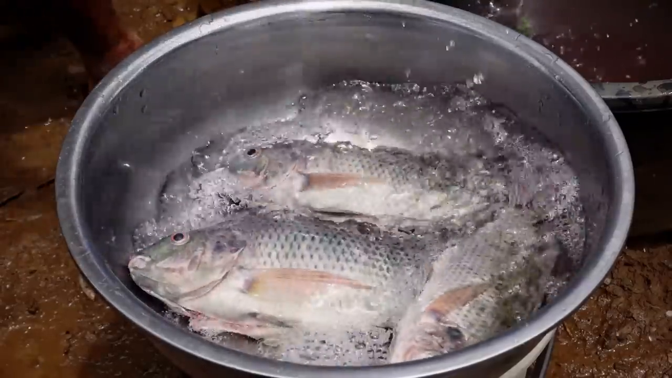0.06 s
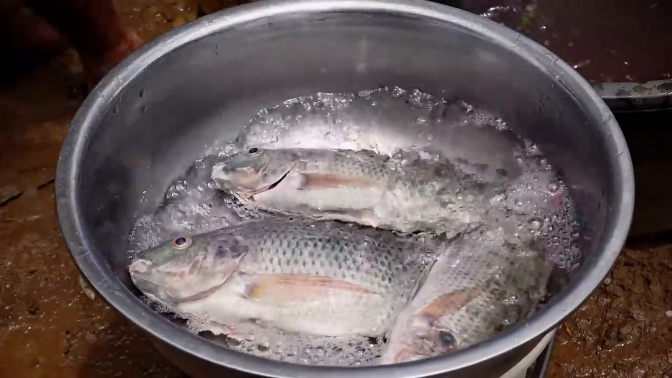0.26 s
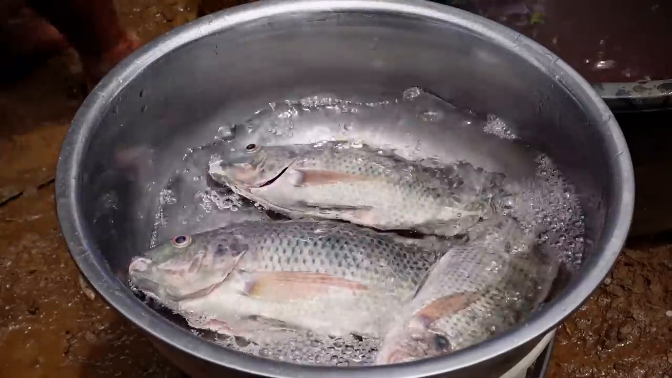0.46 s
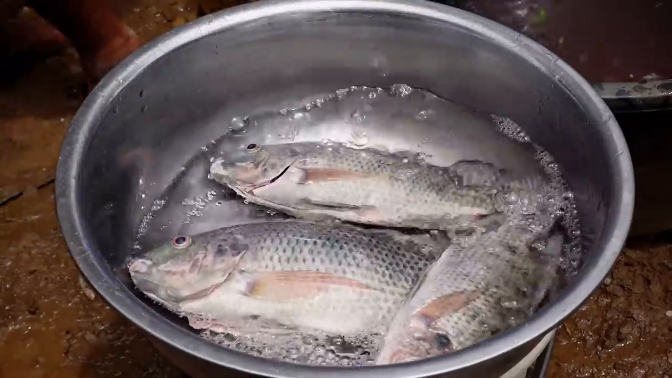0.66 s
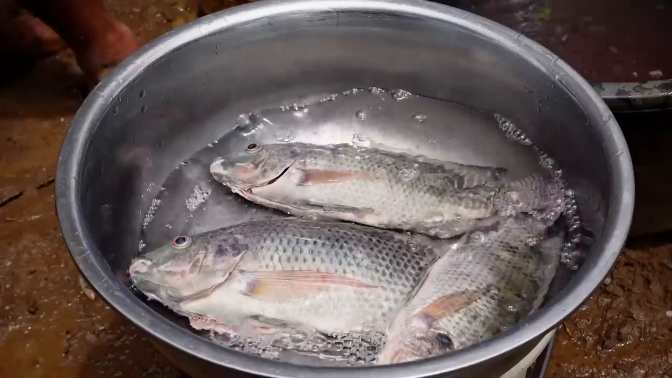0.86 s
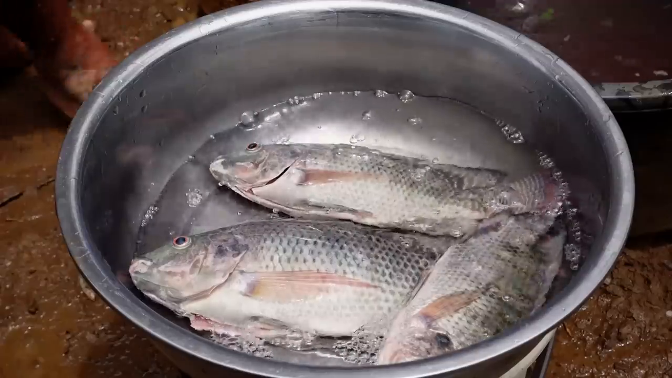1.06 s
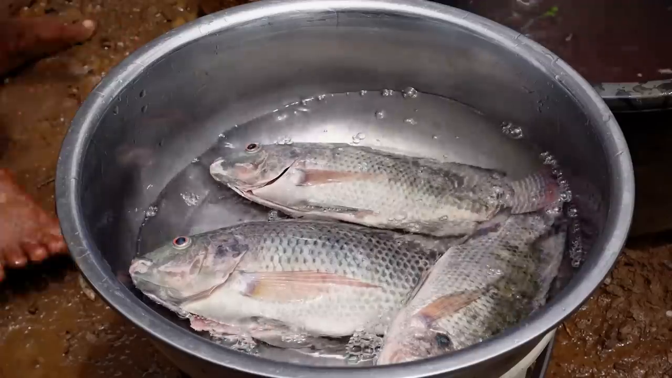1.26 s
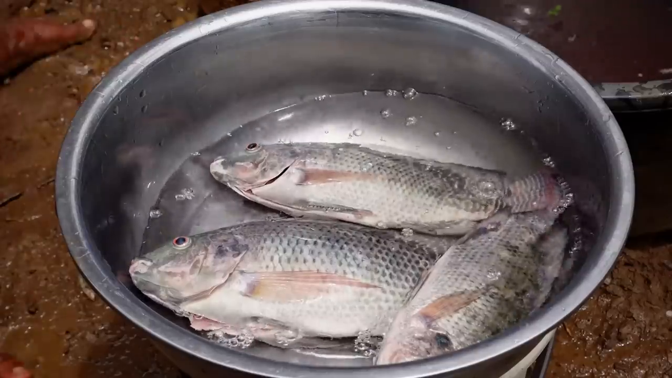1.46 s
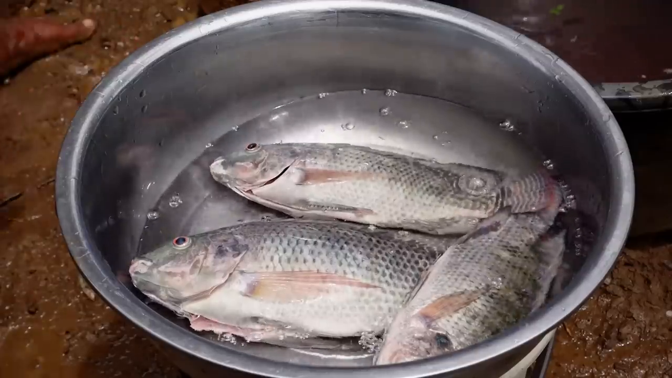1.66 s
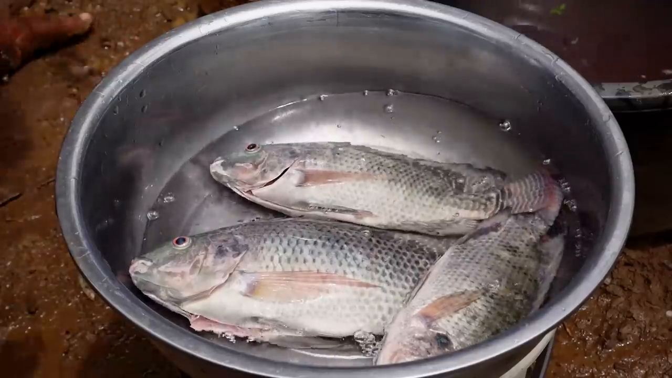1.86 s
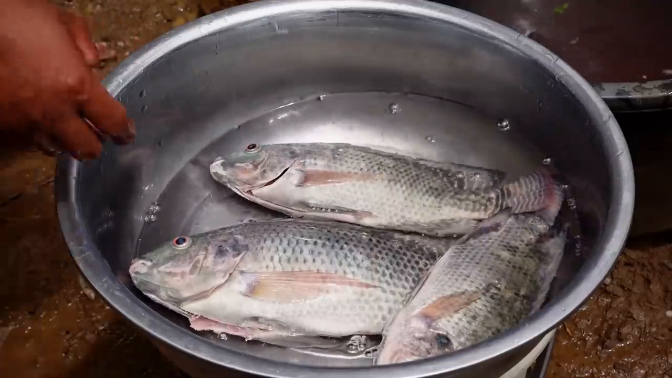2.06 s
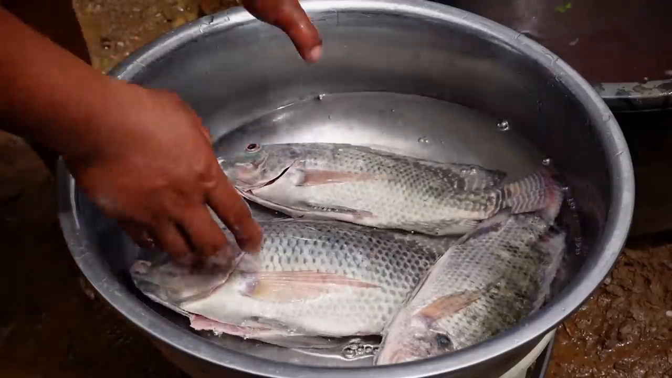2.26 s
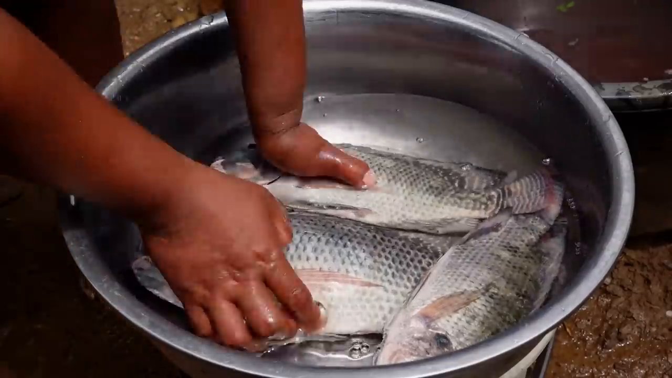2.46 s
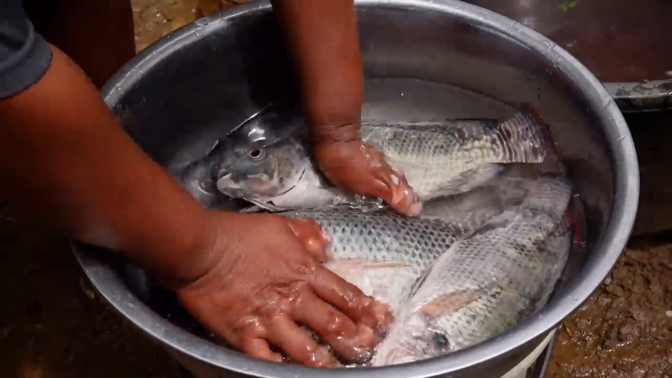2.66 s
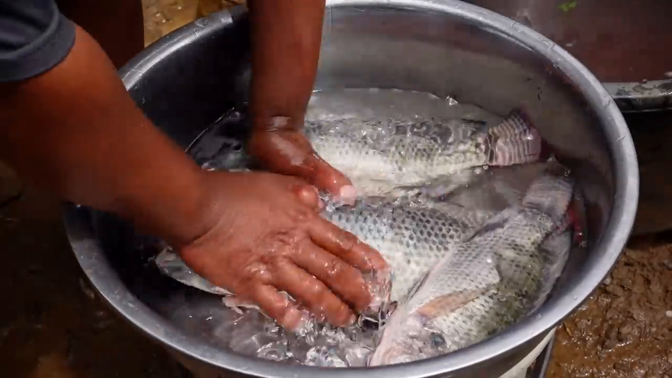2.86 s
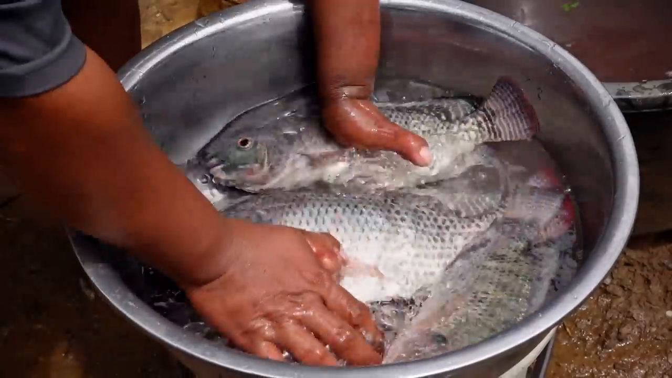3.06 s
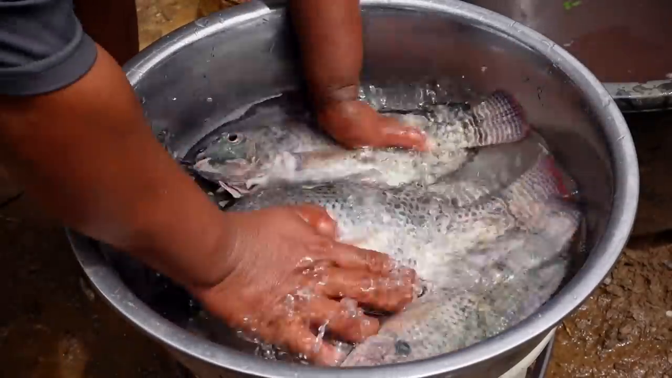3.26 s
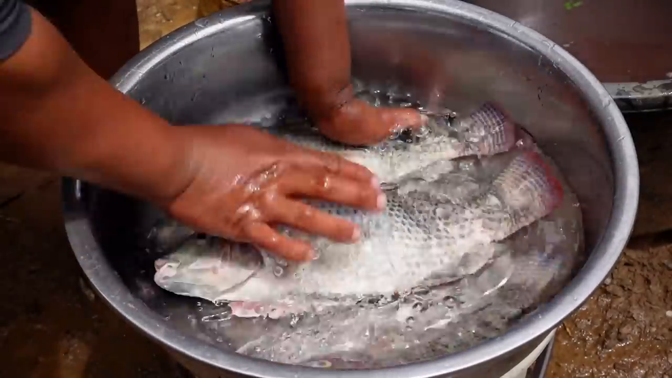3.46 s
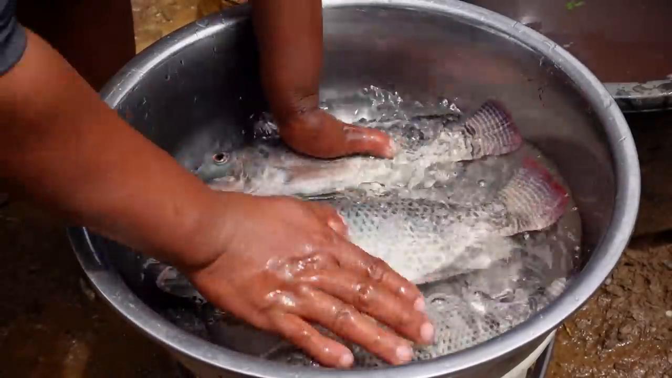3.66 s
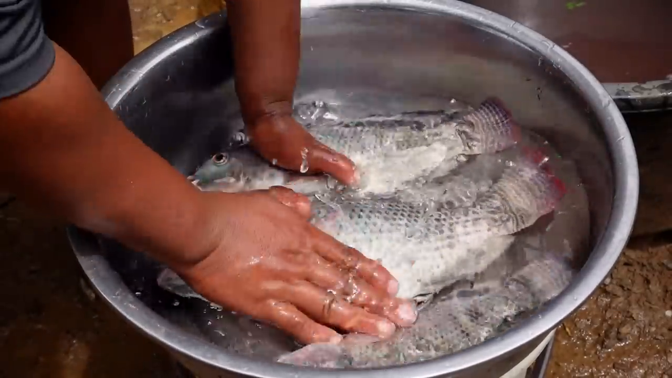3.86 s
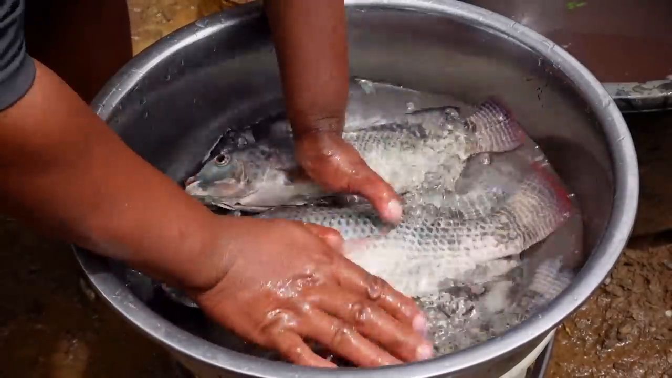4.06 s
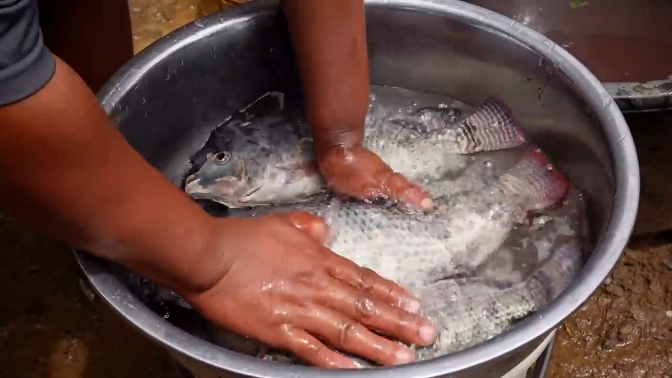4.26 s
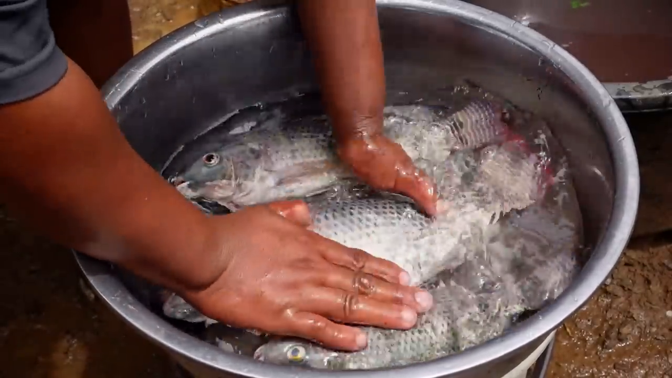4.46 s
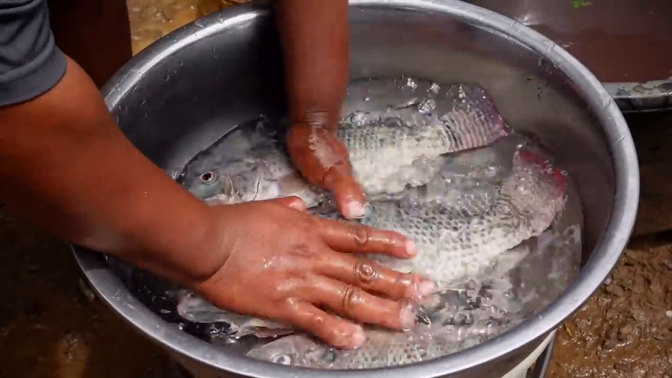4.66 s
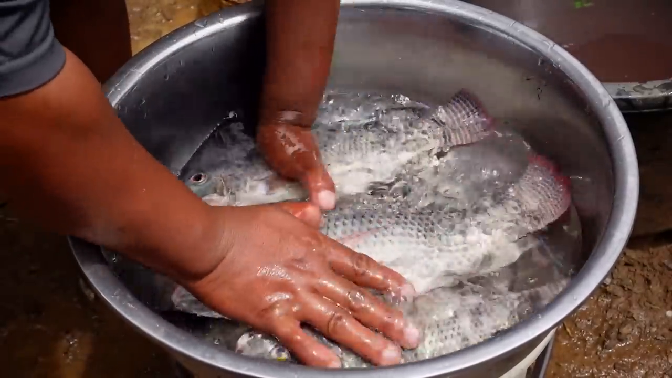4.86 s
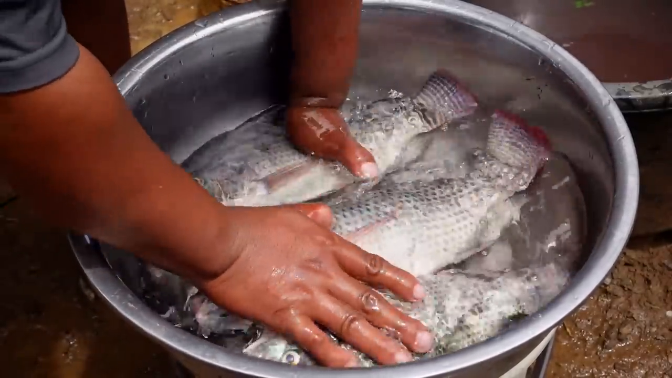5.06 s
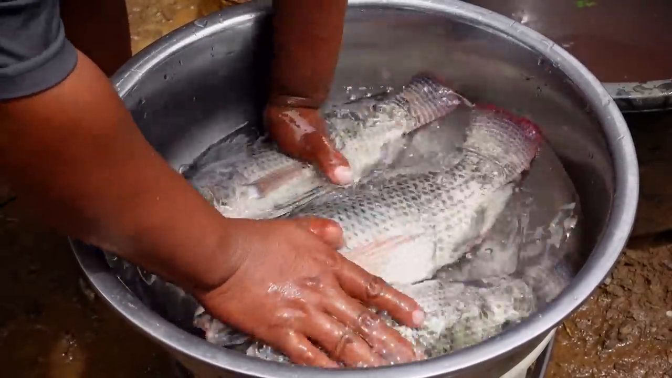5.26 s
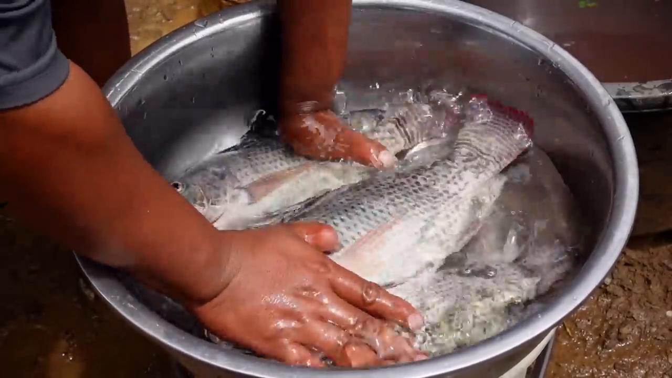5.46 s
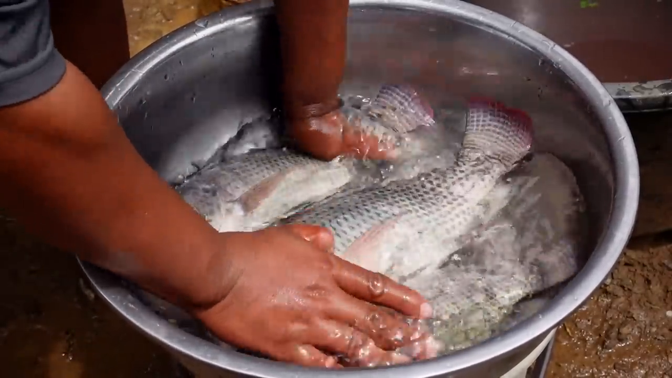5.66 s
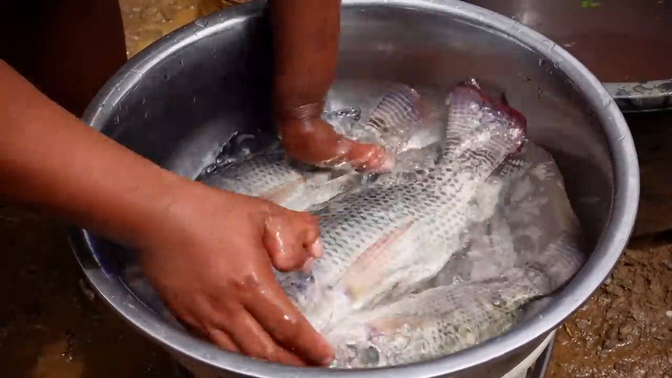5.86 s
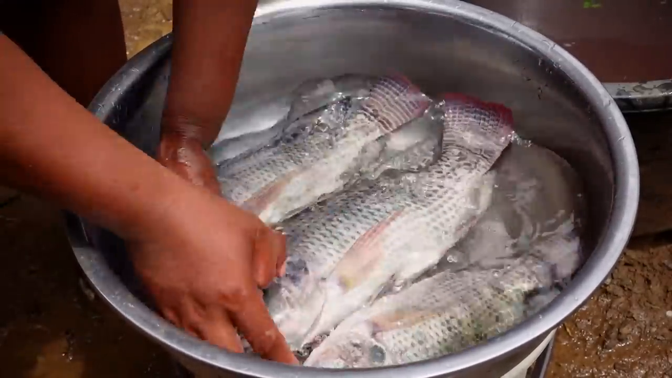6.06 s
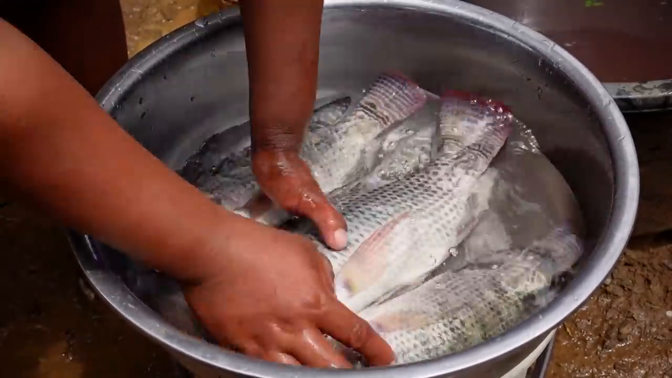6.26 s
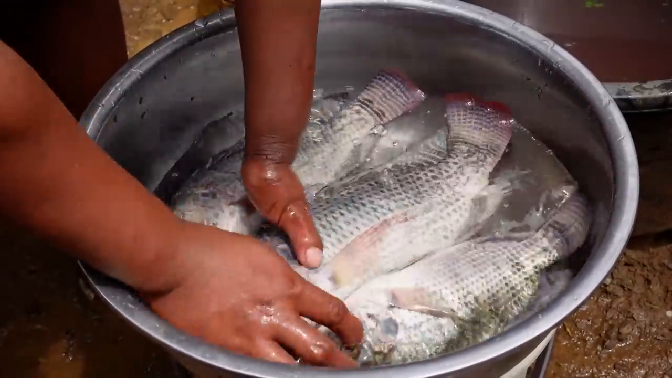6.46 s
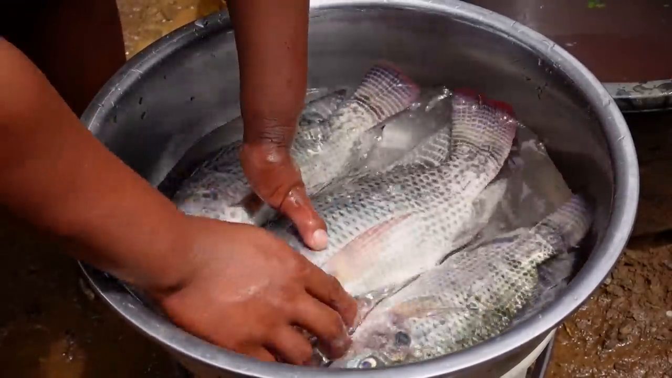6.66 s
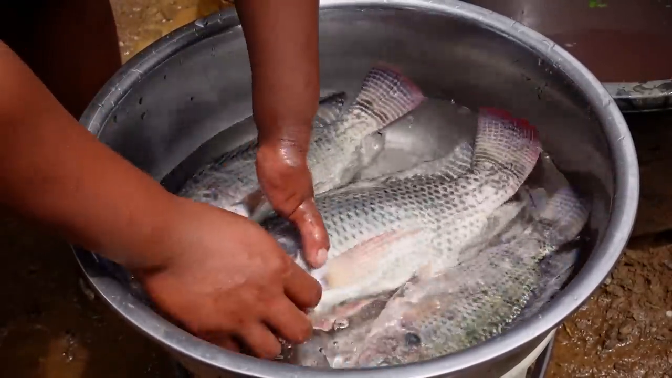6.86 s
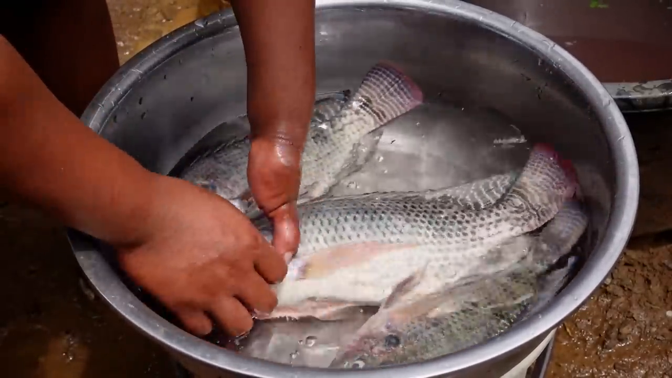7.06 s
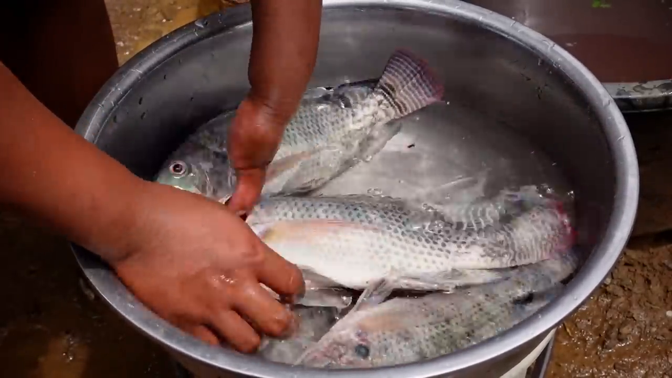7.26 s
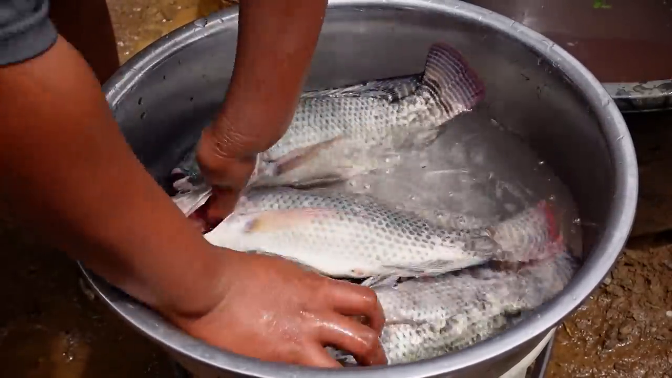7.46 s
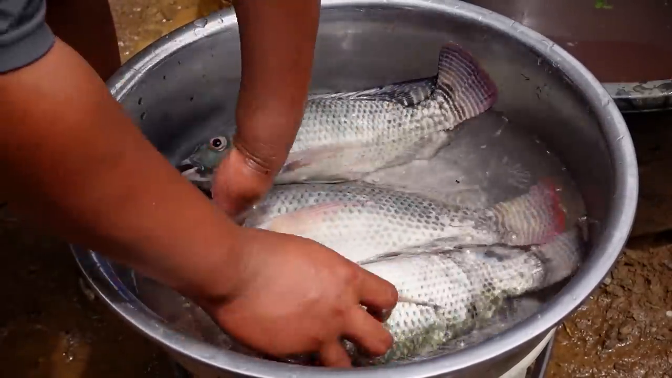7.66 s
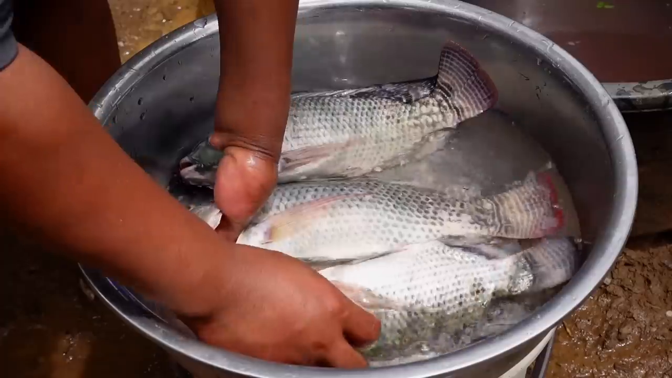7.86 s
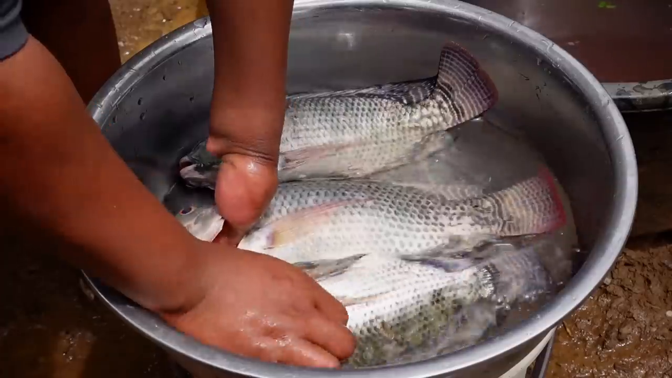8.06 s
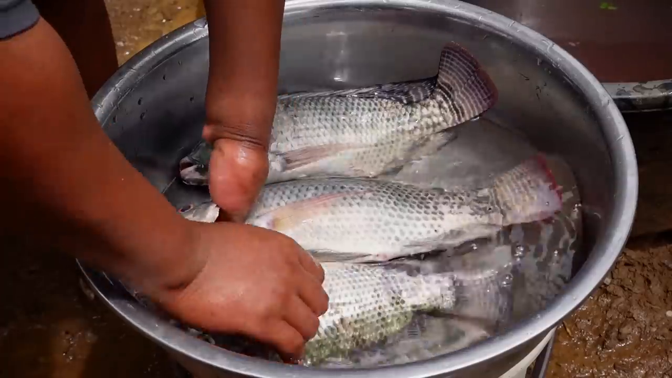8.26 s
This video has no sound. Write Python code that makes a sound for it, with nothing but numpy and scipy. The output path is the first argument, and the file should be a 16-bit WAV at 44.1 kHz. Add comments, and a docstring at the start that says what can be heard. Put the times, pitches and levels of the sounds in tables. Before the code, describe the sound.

Outdoors in a quiet yard with soft airy background, heard close in stereo. At 0 s the end of a strong pour crashes into a steel basin with sharp spatter and bubbles, fizzing away within about half a second; faint birds peep at 0.3 and 0.8. At 1.2-1.5 an emptied pail strikes and skids on wet grit with a hollow, quickly damped ring. Drips and a sharp plop fall around 1.5-2.0. From 2.3 hands enter; sloshing builds, densest at 3.0-3.4 with gurgles, slaps and bubble chirps, then continues in waves. From 4.1 to about 5.8 a close rooster crows four syllables, cracked and raspy, ending in a long, clearer, sagging note with a short house-wall echo. Around 6.4-6.7 fish bump and scrape the steel. Thin falling peeps repeat from 6.2 to 8 as the water quiets to light swishes and a few plops until about 8.4.

```python
"""Washing fish beside a crowing rooster

Hands slosh and drip in a steel basin as a pour fizzes out: enveloped noise, froth and rising bubble tones.
A pail thuds and skids on wet grit: noise scrapes and a ringing body. Small birds peep: gliding sines.
A close rooster crows four syllables, hoarse in places, clearer in the long last stretch: harmonics of a
wavering pitch with a rasp and a lower second voice. Noise tails give the house walls' answer.
"""
import sys
import numpy as np
from scipy import signal
from scipy.fft import rfft, irfft, next_fast_len
from scipy.io import wavfile
from scipy.ndimage import uniform_filter1d, minimum_filter1d, map_coordinates

SR = 44100
rng = np.random.default_rng(int(sys.argv[2]) if len(sys.argv) > 2 else 0)


def generate_wav(signal):
    """Clip the signal to [-1, 1] and save it as 16-bit WAV at the path in sys.argv[1]."""
    frames = np.transpose(np.atleast_2d(signal))
    scaled = np.clip(frames, -1, 1) * 32767
    pcm = np.round(scaled).astype(np.int16)
    wavfile.write(sys.argv[1], SR, pcm)


N = 366471

# colour of the open-air background: (frequency [Hz], relative level [dB])
YARD_COLOUR = [(15, -70), (25, -30), (145, -10.5), (249, 0.5), (988, 7.5), (1800, 2.5), (3920, -0.5),
               (6380, -5.5), (16000, -16.5)]
# background loudness: (time [s], level [dB])
AIR_LEVEL = [(0, -37.5), (1, -40), (7.21, -40.5), (7.26, -48), (8.31, -48.5)]
# stereo width of the background: (frequency [Hz], side minus mid [dB])
AIR_WIDTH = [(1650, -4.5), (4970, -5), (15000, -12.5)]
# decay of the house walls' answer: (frequency [Hz], t60 [s])
WALL_DECAY = [(200, 0.55), (1200, 0.3), (4000, 0.33), (12000, 0.17)]
# small birds: (time [s], relative level [dB], pitch [Hz], fall, negative rises [Hz])
PEEPS = [(0.348, -38, 4230, 647), (0.779, -39.5, 4020, 600), (2.238, -47, 4150, 604),
         (4.05, -40, 5040, -500), (6.221, -39, 4100, 604), (6.69, -37, 4120, 799), (7.1, -37.5, 4070, 797),
         (7.55, -44, 4240, 596), (7.97, -49, 4190, 650)]

# sweeps of water: (time of the height [s], gurgle [dB], spray [dB], swell [s], t60 [s])
SWEEPS = [(0.0, -29.5, -17.5, .02, 0.86), (0.24, -49, -56, 0.022, 0.43), (1.48, -38.5, -31.5, 0.2, 1.5),
          (1.77, -50, -36, 0.099, 2.6), (2.5, -45.5, -34.5, 0.14, 1.9), (2.67, -32, -30, 0.075, 2.2),
          (2.94, -30, -24, 0.048, 0.52), (3.08, -23, -25.5, 0.06, .5), (3.18, -19.5, -22.5, 0.047, 1.02),
          (3.27, -26.5, -21, 0.035, 0.3), (3.491, -30, -25.5, 0.14, 0.4), (3.68, -38, -28, 0.039, 0.39),
          (3.86, -42, -21, 0.048, 0.53), (4.27, -32, -22.5, 0.097, 0.56), (4.8, -27, -29, 0.76, 2.4),
          (5.53, -31.5, -26.5, 0.28, 2.2), (6.04, -35, -31.5, 0.018, 0.43), (6.45, -56, -35, 0.074, 1.1),
          (6.56, -29, -37, 0.076, 0.37), (7.18, -52, -44, 0.052, 1), (7.42, -45.5, -35, 0.041, 0.47),
          (7.6, -48, -37, 0.017, 0.18), (7.7, -46, -39.5, 0.032, 0.49), (7.79, -50, -36, 0.044, 0.19),
          (8.22, -47.5, -63, 0.022, 0.22),]
# colour of large stirred bubbles and slap bodies: (frequency [Hz], relative level [dB])
GURGLE_COLOUR = [(100, -94), (450, -5.5), (900, -2.5), (1600, 7.5), (2400, 12), (3400, 11), (6000, -6)]
# colour of tiny bubbles and droplets: (frequency [Hz], relative level [dB])
SPRAY_COLOUR = [(1200, -33), (2300, 2), (4500, 8.5), (6500, 5.5), (10000, 3), (15500, -12)]
# slaps of water: (time [s], spatter [dB], body [dB], spatter t60 [s])
SLAPS = [(0.003, -16, -16.5, 0.046), (0.0244, -11.5, -12, 0.024), (0.0497, -7, -34, 0.023),
         (0.122, -15, -46, 0.021), (0.154, -11.5, -26, 0.041), (0.165, -6, -55, 0.011),
         (0.218, -21, -12.5, 0.0055), (0.3386, -25, -30, 0.014), (1.7546, -23.5, -28, 0.1),
         (1.7786, -11.5, -4.5, 0.012), (1.9778, -24, -29.5, 0.062), (2.757, -22, -22, 0.019),
         (2.947, -18.5, -17, 0.041), (3.062, -20, -21, 0.031), (3.078, -16, -10.5, 0.029),
         (3.106, -21, -15.5, 0.023), (3.15, -36, -13, 0.038), (3.1734, -22, -13.5, 0.07),
         (3.191, -9.5, -16, 0.013), (3.243, -16, -15.5, .035), (3.262, -16, -19, 0.024),
         (3.287, -12, -25, 0.015), (3.328, -18, -12.5, 0.036), (3.649, -15, -18.5, 0.032),
         (3.8494, -15, -28, 0.029), (3.8807, -24, -26, 0.048), (3.9137, -18, -15, 0.021),
         (3.9423, -22, -22, 0.036), (4.192, -12, -37, 0.023), (4.24, -29, -9, 0.021),
         (4.696, -14, -30, 0.016), (5.4383, -14, -12, 0.038), (5.5214, -15.5, -40, 0.043),
         (5.994, -20.5, -28.5, 0.036), (6.338, -30.5, -33, 0.032), (6.487, -24.5, -43, 0.065),
         (6.646, -33.5, -31.5, 0.073),]
# colour of spatter, ticks and pinch-off clicks: (frequency [Hz], relative level [dB])
SPATTER_COLOUR = [(100, -58), (900, -51), (2000, -15.5), (4500, 8), (7000, 1.5), (11000, -6.5),
                  (16000, -29)]
# fish pushed along the steel: (time [s], relative level [dB], rise [s], t60 [s])
SHOVES = [(2.26, -37, 0.014, 0.72), (6.361, -31, 0.0036, 0.06), (6.497, -30, 0.0026, 0.1),
          (6.52, -27.5, 0.025, 0.34), (6.727, -33, 0.0036, 0.08)]
# colour of the steel basin: (frequency [Hz], relative level [dB])
BASIN_COLOUR = [(100, -69), (250, -9), (600, 6), (1000, 5), (1550, 6), (2000, -2.5), (3100, 3.5),
                (8000, -12), (15000, -39)]
# single air bubbles: (time [s], starting pitch [Hz], level [dB], t60 [s], time to the surface [s])
BUBBLES = [(0.052, 4040, 0, 0.0077, .019), (0.106, 3010, -4.5, 0.052, 0.006),
           (.219, 630, -17.5, 0.34, 0.06), (.338, 3550, -4, 0.0085, .09), (1.487, 4530, -3.5, 0.017, 0.047),
           (2.759, 2790, -10.5, 0.016, .05), (2.778, 2160, -6.5, 0.012, 0.038),
           (2.797, 1360, -22, .09, 0.099), (2.832, 940, -24.5, 0.08, 0.067),
           (2.883, 2750, 6.5, 0.015, 0.05), (2.973, 2040, -13.5, 0.1, 0.085), (3.026, 892, -24, 0.32, 0.12),
           (3.063, 4190, -11, 0.074, 0.047), (3.150, 960, -2, 0.024, .26), (3.186, 2220, -7, 0.022, 0.025),
           (3.274, 3150, 1, 0.012, 0.069), (3.285, 1780, -8, .042, .15), (3.391, 2120, 3, 0.019, 0.014),
           (3.402, 1820, -10, 0.056, 0.32), (3.915, 1390, -11.5, .024, .1),
           (4.008, 2310, -1.5, 0.015, 0.083), (4.449, 2160, -7.5, 0.042, 0.021),
           (5.502, 1810, 5.5, 0.025, 0.023), (6.009, 3530, -9, 0.012, 0.04),
           (6.044, 3970, -5, 0.007, 0.012), (6.371, 865, -11, 0.0069, .19), (6.502, 622, -13, 0.047, 0.23),
           (6.553, 1478, -17.5, 0.18, 0.36), (7.419, 5800, -17, .017, .19),
           (7.973, 1850, -11.5, 0.019, 0.19)]

# contacts of the emptied pail: (time [s], relative level [dB], rise [s], t60 [s], low edge [Hz])
SKIDS = [(1.166, -4.5, 0.00059, 0.019, 1540), (1.169, -25.5, 0.0035, 0.52, 150),
         (1.247, -16, 0.0074, 0.22, 330), (1.345, -17.5, 0.0046, 0.13, 800),
         (1.424, -20.5, 0.016, 0.21, 900)]
# colour of wet grit: (frequency [Hz], relative level [dB])
GRIT_COLOUR = [(100, -41), (160, -8), (500, -12), (1400, -3), (2800, -0.5), (5800, -0.5), (9000, -11.5),
               (16000, -27)]
# ringing modes of the pail's body: (frequency [Hz], relative level [dB], t60 [s])
PAIL_MODES = [(396.4, -3.5, 0.21), (435, -3.5, 0.2), (606, -11, 0.44), (695, -5, 0.12), (823, -10, 0.32),
              (930, -5, 0.19), (1350, -14, 0.35), (1750, -12, 0.42)]

# unbroken stretches of voice: (start [s], end [s], pitch [Hz], scoop from below [0-1], sag [Hz/s],
#   roughness [0-1], fundamental [dB], beak resonance [dB], beak opening [dB/s], rasp [dB],
#   windpipe resonance [Hz], windpipe boost [dB], release t60 [s], throb depth [0-1])
SYLLABLES = [(4.131, 4.24, 782, 0.22, 306, 0.2, -16.5, -17.5, 28, -21.5, 4360, 17, 0.25, 0),
             (4.245, 4.362, 724, 0.02, 238, 0.37, -20.5, -12, -5, -23, 4260, 20, 0.14, 0.43),
             (4.455, 4.556, 841, .2, 30, .28, -18.5, -8.5, -3, -25, 7550, 7.5, 0.51, 0.62),
             (4.631, 4.72, 791.7, 0.04, 70, .06, -13, -8.5, 15, -25.5, 5200, 6.5, 0.17, 0.18),
             (4.74, 5.052, 772.6, 0.05, 119.3, 0.3, -15, -10, 8.5, -27, 5070, 2, 0.24, 0.5),
             (5.07, 5.294, 764, 0.06, 101, 0.49, -21.5, -14.5, -6, -26.5, 4970, 1.5, 0.13, 0.33),
             (5.292, 5.745, 735.6, 0.12, 225, 0.04, -16, -9, -46, -29, 5600, 13, 0.3, .02)]
# cracks where the second voice joins in: (start [s], end [s], pitch [Hz], level [dB], added roughness [0-1])
CRACKS = [(4.14, 4.195, 610, -23, 0.04), (4.241, 4.309, 634.6, -17.5, 0.06), (4.319, 4.412, 540, -28, 0.14),
          (4.464, 4.483, 627, -15, 0.3), (4.602, 4.651, 594, -22, 0.11), (4.734, 4.811, 661, -21.5, 0.13),
          (5.068, 5.134, 587, -26.5, 0.12), (5.133, 5.296, 493.5, -28.5, 0.44),
          (5.735, 5.825, 521, -23.5, 0.36)]
# upper throat, before the windpipe boost: (frequency [Hz], relative level [dB])
RASP_COLOUR = [(1900, 19), (2300, 8.5), (2950, 9.5), (3700, 5), (4600, 7.5), (6000, -4), (7600, -0.5),
               (9300, -11.5), (14000, -66)]
# second voice: (frequency [Hz], relative level [dB])
HOARSE_COLOUR = [(500, -6.5), (620, 4.5), (1100, 1.5), (1600, -2.5), (2200, -11.5), (4800, -22),
                 (9000, -66), (14000, -37)]
# stereo placing of the crow: (frequency [Hz], left minus right [dB])
CROW_LEAN = [(300, 0), (600, -4.5), (760, -9.5), (1100, 4), (1600, -1), (4000, -0.5)]

# froth left by the pour
FOAM_DB, FOAM_FADE_DB_PER_S = -31, 8.5
# spurts: depth at rest, depth added by hard stirring
SPURT_DB, SPURT_STIRRED_DB = 3, 2.5
SLAP_RISE_S, BODY_RISE_S, BODY_RINGS_LONGER = 0.002, 0.00087, 1.46
# click with which a bubble pinches off, relative to its ring
PINCH_DB, PINCH_T60_S = -17.5, 0.003
# sound rattling between the steel sides
BASIN_RING_GAIN, BASIN_RING_T60_S = 0.125594, 0.1
# left minus right of the water, and its share sent back by the walls
WATER_LEAN_DB, WATER_ECHO_DB = -0.5, -25
# first ring of the pail, its loss per contact, random colour spread per skid
THUD_DB, THUD_LOSS_DB, GRIT_UNEVEN_DB = -13, 12, 4
CRACK_EDGE_S, CRACK_T60_S, CRACK_SAG_HZ_PER_S = 0.025, 0.17, 330
# the main voice dips by this much per unit of added roughness
CRACK_DIP_DB = 20.5
ATTACK_S, SCOOP_S = 0.016, 0.042
# relative pitch waver: always present, and added per unit of roughness
WAVER, WAVER_ROUGH = 0.0062, 0.0583
# phase scatter of the upper harmonics [radians]: always present, and added per unit of roughness
RASP_SCATTER, RASP_SCATTER_ROUGH = 0.17, 1.7
# beating of a strained voice, which splits each partial into a cluster
THROB_HZ, THROB_WANDER = 68, 0.13
CROW_ECHO_DB = -6
TOP_HZ = 15900


def amp(db):
    """Decibels to gain."""
    return 10 ** (np.asarray(db) / 20)


def unit(x):
    """Scale to rms 1."""
    return x / np.sqrt(np.mean(x ** 2) + 1e-20)


def along(points, hz):
    """Read a frequency curve on a log axis."""
    f, v = np.transpose(points)
    return np.interp(np.log(hz + 1), np.log(f + 1), v)


def wobble(rate):
    """A smooth random curve as long as the scene, rate knots a second."""
    knots = rng.standard_normal(int(N * rate / SR) + 4)
    return map_coordinates(knots, [np.arange(N) * rate / SR])


def shake(t, rate):
    """A bounded random tremble for sounds of up to a second, rate knots a second."""
    knots = rng.standard_normal(int(rate) + 4)
    return np.tanh(map_coordinates(knots, [t * rate], mode="mirror"))


def held(t, length, attack, t60):
    """Attack, hold, release."""
    return np.clip(t / attack, 0, 1) * amp(-60 * np.maximum(t - length, 0) / t60)


def filtered(x, response):
    """Multiply the spectrum of x by a response of frequency."""
    n = x.shape[-1]
    m = next_fast_len(n + 4096)
    return irfft(rfft(x, m) * response(np.fft.rfftfreq(m, 1 / SR)), m)[..., :n]


def coloured(x, spectrum):
    """Lay a spectrum on x, at rms 1."""
    return unit(filtered(x, lambda hz: amp(along(spectrum, hz))))


def low_cut(x, edge_hz):
    """A steep high-pass."""
    sos = signal.butter(3, np.clip(edge_hz, 20, 8000), "highpass", fs=SR, output="sos")
    return signal.sosfilt(sos, x)


def add(track, s, sound):
    """Mix a sound into a track at a time in seconds."""
    part = track[max(round(s * SR), 0):][:len(sound)]
    part += sound[:len(part)]


def burst(spectrum, rise, t60):
    """Countless small impacts blend into a swelling, dying puff of noise."""
    t = np.arange(SR // 3) / SR
    shape = np.minimum(t / rise, 1) ** 2 * amp(-60 * np.maximum(t - rise, 0) / t60)
    return shape * coloured(rng.standard_normal(len(t)), spectrum)


def air():
    """Soft open-air background noise, widest in the bass, whose level drops late on."""
    mid, side = coloured(rng.standard_normal((2, N)), YARD_COLOUR)
    side = filtered(side, lambda hz: amp(along(AIR_WIDTH, hz)))
    times, levels_db = np.transpose(AIR_LEVEL)
    level_db = np.interp(np.arange(N) / SR, times, levels_db)
    return amp(level_db) * unit(np.array([mid + side, mid - side]))


def walls(x):
    """The house walls answer with a decaying noise tail, different at each side, highs mostly dying first."""
    hz, _, bins = signal.stft(rng.standard_normal((2, SR // 2)), SR, nperseg=256)
    t = np.arange(bins.shape[-1]) * 128 / SR
    decay = amp(-60 * t / along(WALL_DECAY, hz)[:, None])
    tail = signal.istft(bins * decay, SR, nperseg=256)[1]
    delayed = np.pad(x, (300, 0))  # samples
    return signal.fftconvolve(delayed[None], tail / np.linalg.norm(tail[0]), axes=1)[:, :N]


def birds():
    """Small, distant birds peep with a gliding, breathy whistle: mostly falling, one rising."""
    song = np.zeros(N)
    t = np.arange(SR // 5) / SR
    progress = t / t[-1]
    for s, db, hz, fall_hz in PEEPS:
        # fast random pitch jitter makes the tone breathy
        pitch = hz - fall_hz * progress ** 2 + 600 * rng.standard_normal(len(t))
        whistle = np.sin(2 * np.pi * np.cumsum(pitch) / SR)
        swell = np.minimum(t / 0.019, 1) * (1 - progress ** 2)
        add(song, s, amp(db) * whistle * swell)
    return amp(-4) * song + amp(-5.5) * walls(song)


def bubble(t, hz, t60, surface_s):
    """A ringing air pocket whose pitch climbs as it nears the surface, where it bursts and falls silent."""
    risen = np.clip(t / surface_s, 0, 1)  # share of the way to the surface
    climb_octaves = 1.4 * risen ** 1.5
    phase = 2 * np.pi * np.cumsum(hz * 2 ** climb_octaves, axis=-1) / SR
    return np.sin(phase) * amp(-60 * t / t60) * (1 - risen ** 8)


def froth(hz, cycles, spread_db, surface_s, count):
    """A cloud of short bubble rings of random pitch and size; cycles is their t60 in starting periods."""
    t = np.arange(700) / SR
    pitch = np.clip(hz * np.exp(0.45 * rng.standard_normal((count, 1))), 300, 12000)
    # most bubbles are faint
    size = amp(spread_db * np.minimum(rng.exponential(size=(count, 1)), 3))
    start = rng.integers(0, N, (count, 1))
    onset = 1 - np.exp(-t * pitch)
    grains = size * bubble(t, pitch, cycles / pitch, surface_s) * onset
    places = start + np.arange(len(t))
    return unit(np.bincount(places.ravel(), grains.ravel(), minlength=N)[:N])


def stirring():
    """Gurgle and spray levels in dB: sweeps swell and die away, with fading foam in the spray."""
    t = np.arange(N) / SR
    gurgle = np.zeros(N)
    spray = amp(FOAM_DB - FOAM_FADE_DB_PER_S * t) ** 2
    for s, gurgle_db, spray_db, swell, t60 in SWEEPS:
        rise = np.exp(-np.minimum((t - s) / swell, 0) ** 2)
        fall = amp(-60 * np.maximum(t - s, 0) / t60)
        power = (rise * fall) ** 2
        gurgle += amp(gurgle_db) ** 2 * power
        spray += amp(spray_db) ** 2 * power
    return 10 * np.log10(np.array([gurgle, spray]) + 1e-12)


def slosh():
    """Stirred water: larger bubbles gurgle, tiny ones and droplets fizz."""
    gurgle_db, spray_db = stirring()
    # the harder the water is stirred, the more it comes in spurts and ringing bubbles
    stir = np.clip((spray_db + 41) / 14, 0, 1)
    chirps = stir * coloured(froth(3000, 30, 4, 0.037, count=2800), SPRAY_COLOUR)

    large_bubbles = froth(1450, 30, 3.5, 0.055, count=3200)
    gurgle = coloured(large_bubbles + 0.5 * rng.standard_normal(N), GURGLE_COLOUR)

    tiny_bubbles = (0.5 + 0.67 * stir) * froth(5450, 80, 1.1, 0.0233, count=7000)
    spray = coloured(tiny_bubbles + 0.8 * rng.standard_normal(N), SPRAY_COLOUR)

    # surface bubbles burst with a tick
    ticks = coloured(froth(8500, 5, 6.5, 0.09, count=300), SPATTER_COLOUR)
    fizz = amp(-3 - 4.2 * stir) * spray + amp(-10.5) * chirps + amp(-11.5) * ticks
    spurts = amp((SPURT_DB + SPURT_STIRRED_DB * stir) * np.tanh(wobble(70)))
    return spurts * (amp(gurgle_db) * gurgle + amp(spray_db) * fizz)


def splashes():
    """Small slaps of water, each of its own colour, and fish juddering over the steel, as noise bursts."""
    slaps, shoves = np.zeros((2, N))
    for s, db, body_db, t60 in SLAPS:
        colour = [(hz, level + 3 * rng.standard_normal()) for hz, level in SPATTER_COLOUR]
        spatter = burst(colour, SLAP_RISE_S, t60)
        body = burst(GURGLE_COLOUR, BODY_RISE_S, BODY_RINGS_LONGER * t60)
        add(slaps, s, amp(db) * spatter + amp(body_db) * body)
    for s, db, rise, t60 in SHOVES:
        add(shoves, s, amp(db) * burst(BASIN_COLOUR, rise, t60))
    judder = amp(3.4 * wobble(160))
    return low_cut(slaps, 113) + shoves * judder


def plops():
    """Drips and fingers trap single large bubbles, each born with a tiny click."""
    out = np.zeros(N)
    t = np.arange(SR // 8) / SR
    for s, hz, db, t60, surface_s in BUBBLES:
        ring = bubble(t, hz, t60, surface_s) * (1 - np.exp(-t / 0.00063))
        noise = coloured(rng.standard_normal(len(t)), SPATTER_COLOUR)
        click = amp(PINCH_DB - 60 * t / PINCH_T60_S) * noise
        add(out, s, amp(db) * (ring + click))
    return low_cut(out, 350)


def in_basin(x):
    """The steel sides throw each splash back and forth for a moment: a short coloured noise tail."""
    t = np.arange(SR // 6) / SR
    ring = coloured(rng.standard_normal(len(t)), BASIN_COLOUR) * amp(-60 * t / BASIN_RING_T60_S)
    return x + BASIN_RING_GAIN * signal.fftconvolve(x, ring / np.linalg.norm(ring))[:N]


def pail_skids():
    """Grit scrapes along the pail and rattles its shell at every contact."""
    out = np.zeros(N)
    t = np.arange(SR // 3) / SR
    bands = np.geomspace(40, 16000, 60)
    for s, db, rise, t60, edge_hz in SKIDS:
        uneven = GRIT_UNEVEN_DB * rng.standard_normal(len(bands))
        colour = np.column_stack([bands, along(GRIT_COLOUR, bands) + uneven])
        scrape = low_cut(burst(colour, rise, t60), edge_hz)
        # many close, short modes, others at each contact
        shell = rng.standard_normal(len(t)) * amp(-60 * t / 0.029)
        rattle = signal.fftconvolve(scrape, shell / np.linalg.norm(shell))[:len(t)]
        add(out, s, amp(db) * (amp(3) * scrape + amp(1.5) * rattle))
    return out * amp(2 * wobble(430))


def pail_thuds():
    """The pail's body rings at each contact after the first, less every time, unsteady as it rocks."""
    out = np.zeros(N)
    t = np.arange(SR // 3) / SR
    for k, (s, *_) in enumerate(SKIDS[1:]):
        thud = np.zeros(len(t))
        for hz, db, t60 in PAIL_MODES:
            decay = amp(db + rng.normal(0, 0.82) - 60 * t / t60)
            phase = 2 * np.pi * (hz * t + rng.random()) + 1.25 * shake(t, 77)
            thud += decay * np.sin(phase)
        onset = 1 - np.exp(-t / 0.0014)
        add(out, s, amp(THUD_DB - THUD_LOSS_DB * k) * low_cut(thud * onset, 240))
    return out


def overtones(pitch, throat, orders, scatter=lambda: 0):
    """Harmonics of a moving pitch through a throat (Hz to dB), each with its own phase scatter, near rms 1."""
    phase = 2 * np.pi * np.cumsum(pitch) / SR
    gains = [amp(throat(k * pitch)) for k in orders]
    total = sum(g * np.sin(k * phase + scatter()) for k, g in zip(orders, gains))
    return total / np.sqrt(sum(g * g for g in gains) / 2)


def strain(s):
    """Added roughness and dip in dB that the cracks bring to the main voice at these times."""
    inside = np.array([np.clip(0.5 + np.minimum(s - start, end - s) / CRACK_EDGE_S, 0, 1)
                       for start, end, *_ in CRACKS])
    added = np.transpose(CRACKS)[-1] @ inside
    return added, CRACK_DIP_DB * added


def syllable(start, end, hz, scoop, sag, rough, low_db, beak_db, opening_db, rasp_db,
             pipe_hz, pipe_db, t60, throb):
    """The pitch scoops up, then sags; under strain it scatters and the voice turns hoarse."""
    t = np.arange(SR) / SR
    cracked, dip_db = strain(start + t)
    rough = np.abs(rough + cracked)

    pitch = (hz - sag * t) * (1 - scoop * np.exp(-(t / SCOOP_S) ** 2))
    waver = WAVER * shake(t, 30.26) + WAVER_ROUGH * rough * shake(t, 110.24)
    pitch = pitch * (1 + waver + 0.201 * rough ** 2 * shake(t, 500))
    phase = 2 * np.pi * np.cumsum(pitch) / SR

    def flutter():
        """Random loudness, deeper in a rough voice."""
        return 1 + 1.2 * np.sqrt(rough) * shake(t, 150)

    # the beak lifts the second harmonic as it opens
    beak = amp(beak_db + opening_db * np.minimum(t, end - start))
    tones = amp(low_db) * flutter() * np.sin(phase) + beak * flutter() * np.sin(2 * phase)

    def throat(f):
        """Throat colour with the windpipe boost; each harmonic swells and fades on its own."""
        windpipe = pipe_db / (1 + (np.log(f / pipe_hz) / 0.22) ** 4)
        return along(RASP_COLOUR, f) + windpipe + 6 * shake(t, 14)

    def scatter():
        """Random phase that smears a harmonic into a rasp, more under strain."""
        return (RASP_SCATTER + RASP_SCATTER_ROUGH * rough) * shake(t, 500)

    rasp = overtones(pitch, throat, np.arange(3, 19), scatter)
    effort = held(t, end - start, ATTACK_S, t60)
    throb_hz = THROB_HZ * (1 + THROB_WANDER * shake(t, 24.2))
    beating = 1 + throb * np.sin(2 * np.pi * np.cumsum(throb_hz) / SR)
    voice = effort * amp(-dip_db) * tones + effort ** 2 * amp(rasp_db - dip_db) * rasp
    return beating * voice


def crack(start, end, hz, db):
    """The other side of the syrinx adds a lower, sagging note with a trembling pitch."""
    t = np.arange(SR // 3) / SR
    pitch = hz - CRACK_SAG_HZ_PER_S * np.minimum(t, end - start)
    pitch = pitch * (1 + 0.0324 * shake(t, 132) + 0.072 * shake(t, 603))
    note = overtones(pitch, lambda f: along(HOARSE_COLOUR, f), np.arange(1, 16))
    return amp(db) * held(t, end - start, CRACK_EDGE_S, CRACK_T60_S) * note


def rooster():
    """One side of the syrinx sings the syllables; the other joins in at each crack."""
    voice = np.zeros(N)
    for row in SYLLABLES:
        add(voice, row[0], syllable(*row))
    for start, end, hz, db, _ in CRACKS:
        add(voice, start - CRACK_EDGE_S / 2, crack(start, end, hz, db))
    # little sounds below the voice
    return filtered(voice, lambda hz: hz ** 6 / (hz ** 6 + 440 ** 6))


def scene():
    """The basin lies nearly straight ahead; the crow's fundamental leans to the right."""
    water = in_basin(plops() + splashes() + slosh()) + pail_skids() + pail_thuds()
    sides = np.array([[0.5], [-0.5]])
    basin = water * amp(WATER_LEAN_DB * sides) + amp(WATER_ECHO_DB) * walls(water)
    crow = rooster()
    placed_crow = filtered(crow, lambda hz: amp(sides * along(CROW_LEAN, hz)))
    echo = amp(CROW_ECHO_DB) * walls(crow)
    return air() + birds() + basin + placed_crow + echo


def record(dry):
    """A fast limiter ducks the loudest peaks; a brick-wall filter ends the treble at the band limit."""
    needed = np.minimum(1, 1 / (np.abs(dry).max(axis=0) + 1e-9))
    gain = uniform_filter1d(minimum_filter1d(needed, size=260), size=130)
    return filtered(dry * gain, lambda hz: hz < TOP_HZ)


dry = scene()
out = record(dry)
generate_wav(out)
```